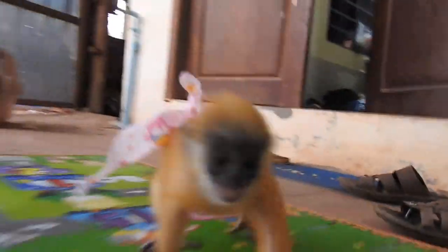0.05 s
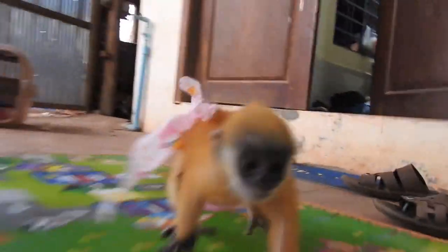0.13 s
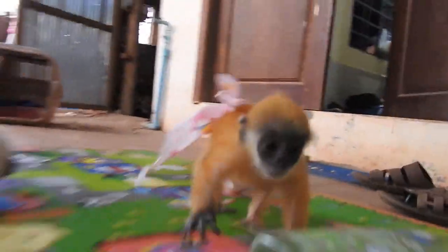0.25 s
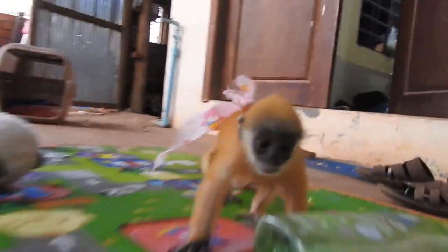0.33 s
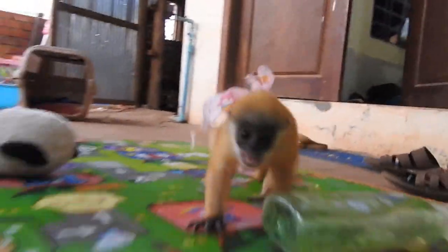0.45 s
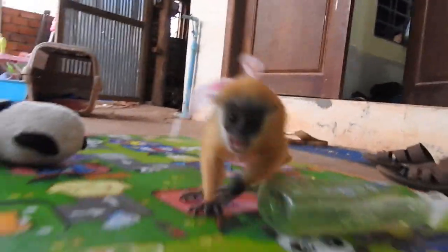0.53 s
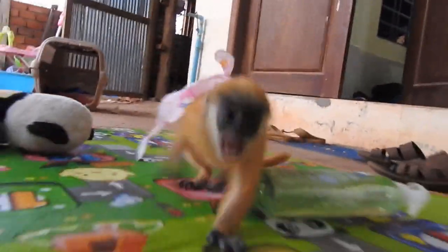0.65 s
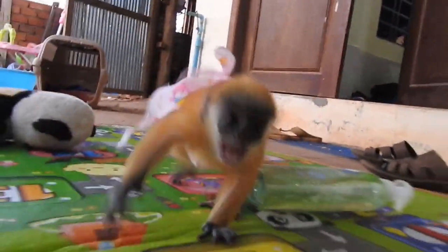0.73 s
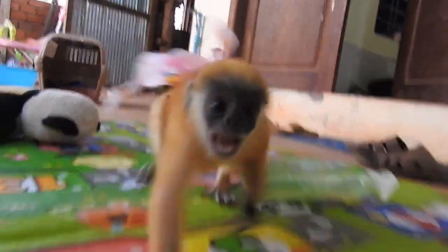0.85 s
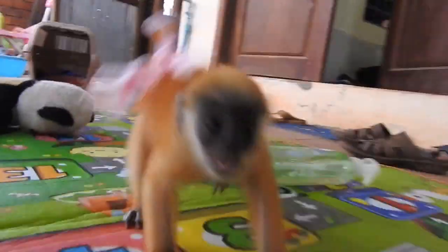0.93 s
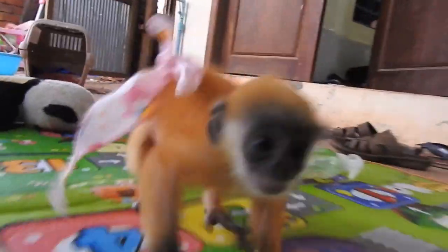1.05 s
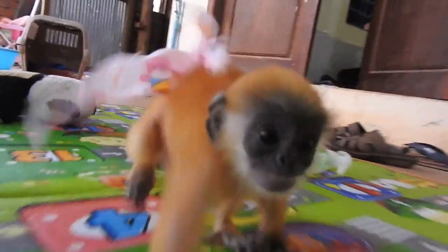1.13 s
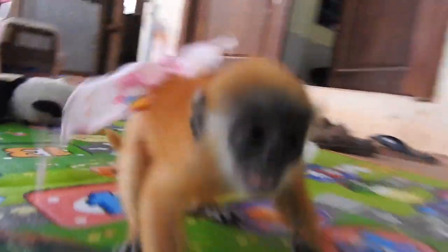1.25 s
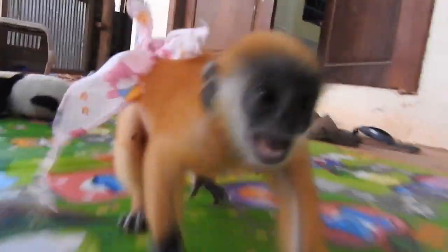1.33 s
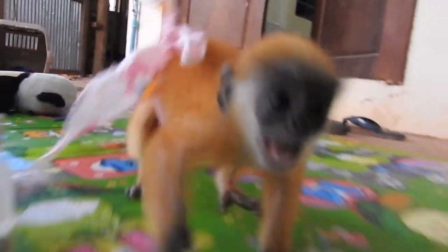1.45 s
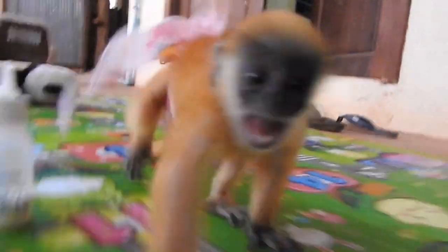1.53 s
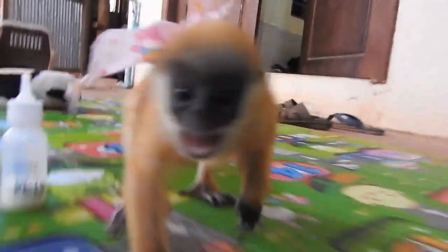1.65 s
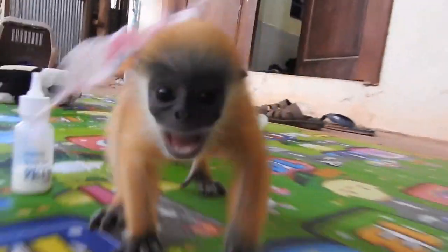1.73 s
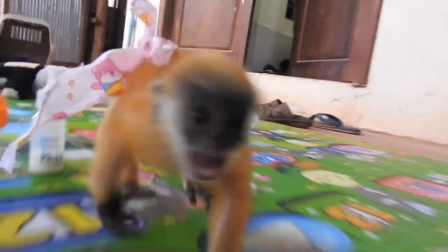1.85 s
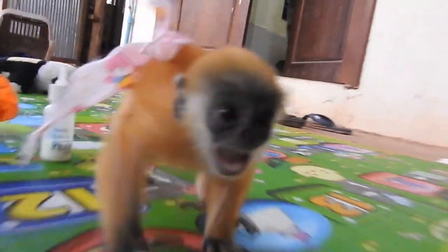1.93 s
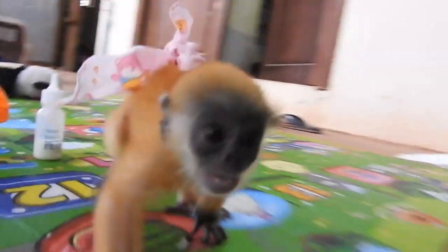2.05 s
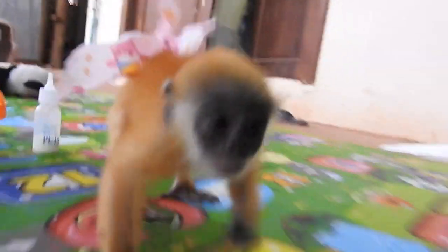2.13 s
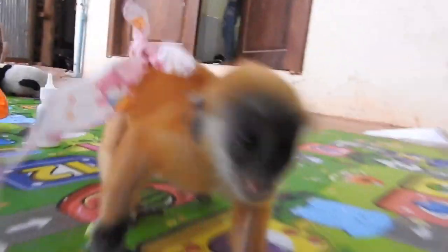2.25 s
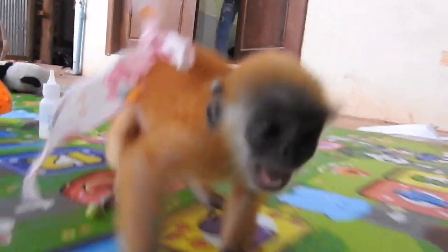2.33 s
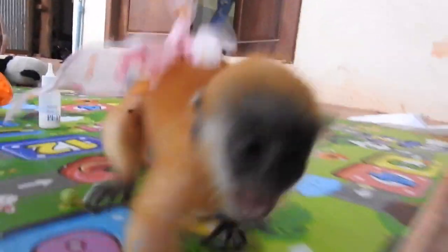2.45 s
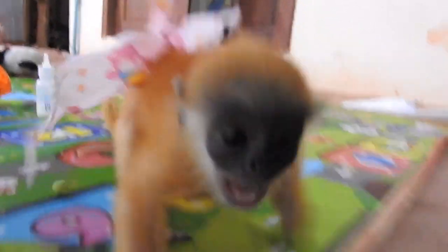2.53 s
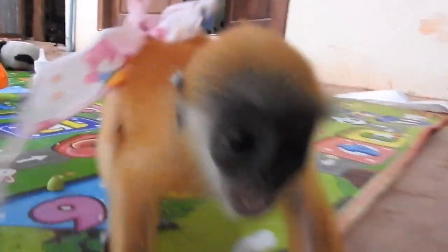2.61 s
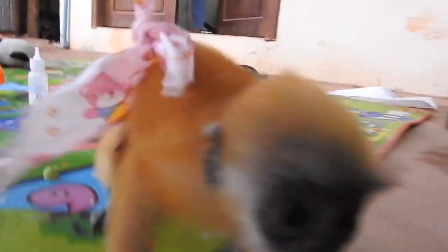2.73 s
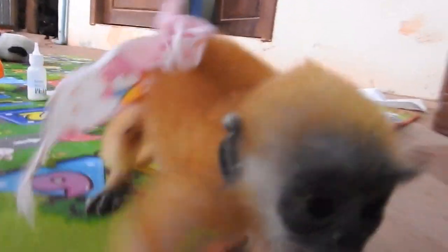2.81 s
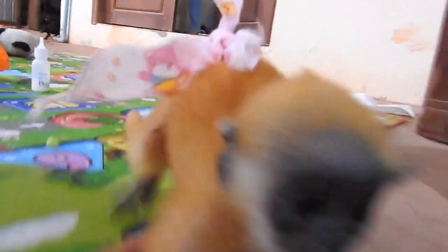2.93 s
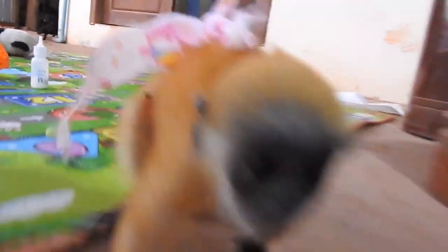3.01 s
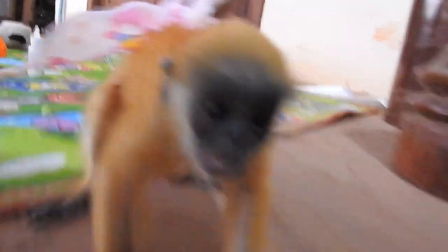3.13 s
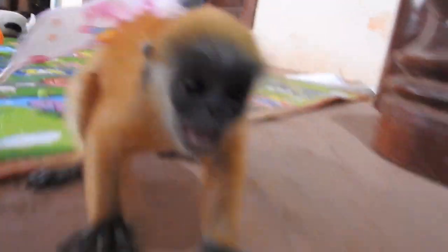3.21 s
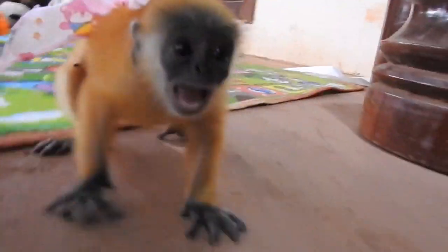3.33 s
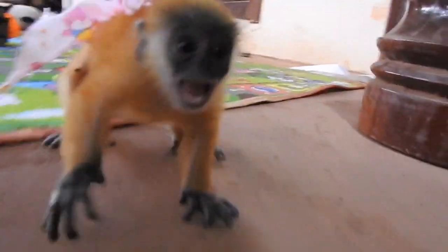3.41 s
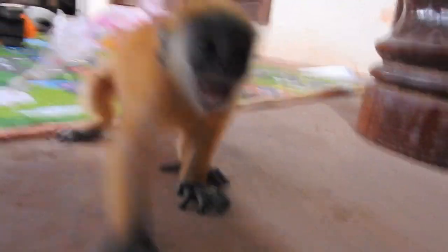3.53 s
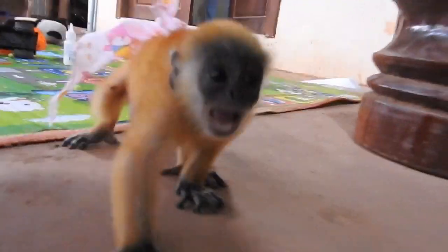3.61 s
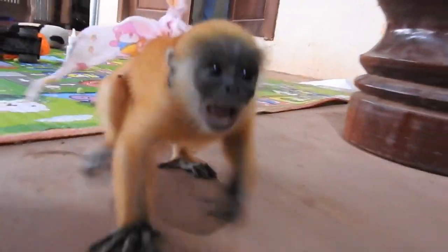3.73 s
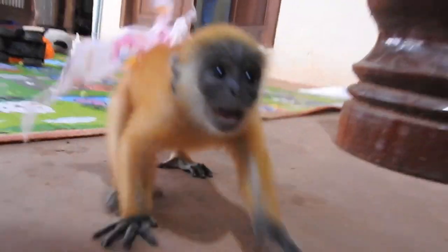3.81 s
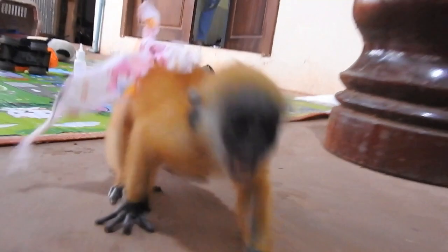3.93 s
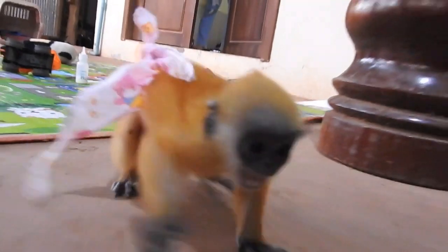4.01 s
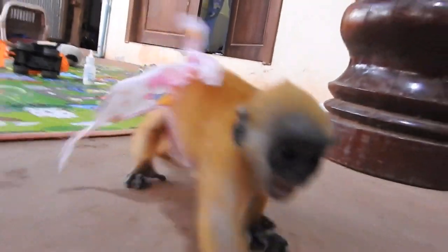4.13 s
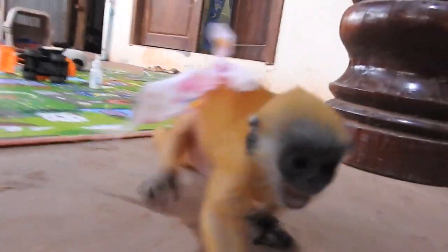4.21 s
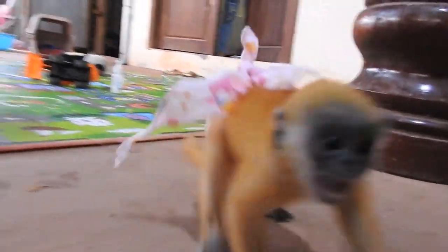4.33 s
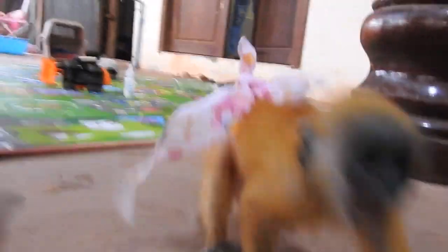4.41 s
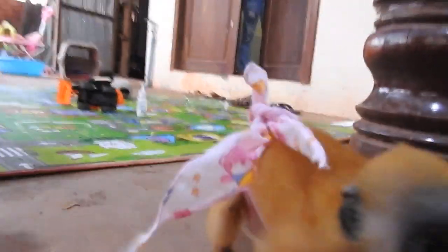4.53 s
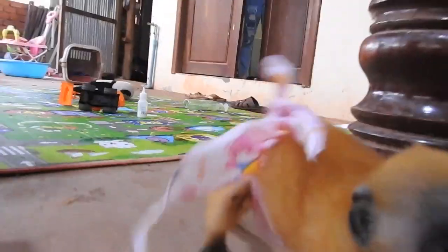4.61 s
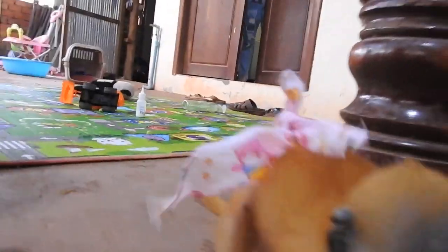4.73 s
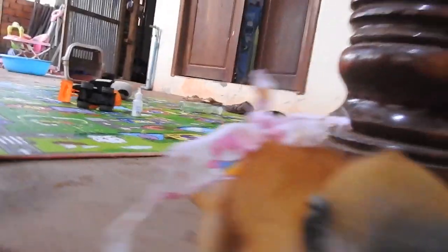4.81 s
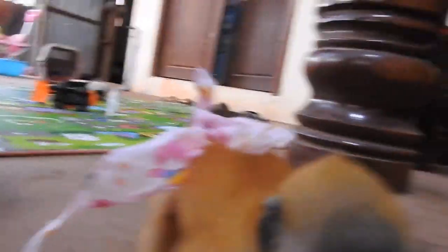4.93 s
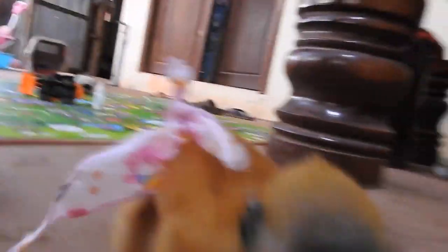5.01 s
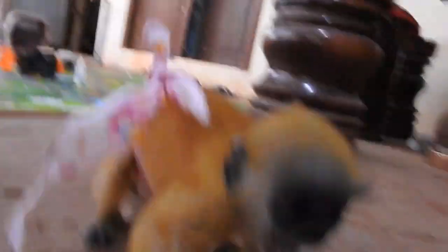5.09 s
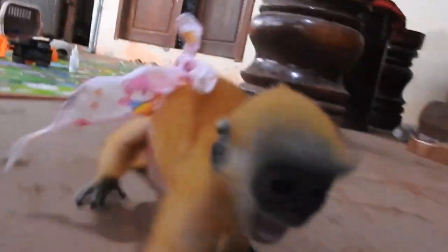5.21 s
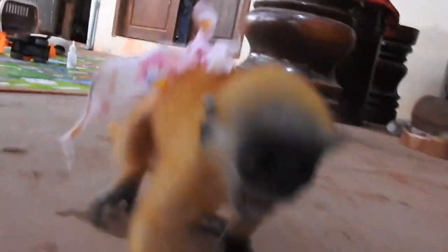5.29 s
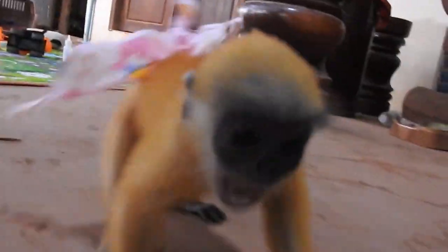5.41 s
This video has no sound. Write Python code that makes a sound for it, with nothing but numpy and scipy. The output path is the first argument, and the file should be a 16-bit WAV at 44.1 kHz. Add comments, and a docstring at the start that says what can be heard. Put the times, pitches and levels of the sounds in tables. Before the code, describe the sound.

Very close, bright, loud animal calls: a baby monkey's thin nasal cries climb into shrill quavering wails and break off with an upward flick. Early on, one splinters into raspy shrieks; a later one cracks briefly. Snatched gasps fill the gaps. Palms and feet thud lightly on mat and floor over uneven low rumble, with short reflections from nearby walls.

```python
"""A baby monkey crawls over a play mat and a porch floor, crying close to two microphones.
It opens on the end of a shriek; then come a gasp and a cry that breaks into a string of rough shrieks.
Five more cries follow, the second of them breaking too: harmonics gliding through throat and mouth.
Gasps of shaped noise come between cries, and hands and feet pat the floor as resonant noise bursts.
Throughout, a low noise rumble and faint scuffs run beneath, and the walls give a short echo."""
import sys
import numpy as np
from scipy import signal
from scipy.fft import rfft, irfft, next_fast_len
from scipy.io import wavfile
from scipy.ndimage import uniform_filter1d

SR = 44100
rng = np.random.default_rng(int(sys.argv[2]) if len(sys.argv) > 2 else 0)


def to_wav(sig):
    """Store sig (one row per channel, or 1-D mono) as 16-bit WAV at the path in sys.argv[1].

    Samples outside -1..1 are clipped; the rate is SR.
    """
    pcm = np.clip(np.atleast_2d(sig), -1, 1) * 32767
    pcm = np.round(pcm).astype(np.int16)
    wavfile.write(sys.argv[1], SR, pcm.T)  # frames by channels


N = 240697
TIME = np.arange(N) / SR  # s

# Colour of the background rumble. Each row: frequency in Hz, relative level in dB.
RUMBLE_COLOUR = [(25, -42), (55, -5.5), (90, 3), (130, 1), (250, -8.5), (400, -18.5), (800, -14),
                 (1500, -19), (3000, -17.5), (7000, -21.5), (11000, -41), (15000, -51)]
# Colour of skin on the floor. Each row: frequency in Hz, relative level in dB.
PAT_COLOUR = [(80, 3), (280, 10), (550, 4), (1200, 3), (2000, -5), (5000, -4.5), (12000, -65)]
# Pats of hands and feet. Each row: start in seconds, level in dB before the overall trim,
# main pitch in Hz, ring time to -60 dB in seconds.
PATS = [(0.177, -17.5, 1400, 0.05), (0.361, -25, 895, 0.034), (0.439, -33, 2620, 0.015),
        (1.248, -26.5, 1580, 0.35), (1.493, -22.5, 2080, 0.15), (1.524, -11.5, 556, 0.057),
        (1.694, -17, 1260, 0.035), (1.909, -19, 250, 0.039), (1.927, -18.5, 1130, 0.048),
        (2.081, -17.5, 1292, 0.027), (2.112, -18, 300, 0.14), (2.922, -15, 526, 0.15),
        (2.974, -21.5, 530, 0.044), (2.992, -19.5, 690, 0.082), (3.313, -15.5, 735, 0.12),
        (3.828, -11.5, 525, 0.17), (4.644, -21.5, 1440, 0.14), (4.872, -18.5, 406, 0.066)]
# Colour of the indrawn breath. Each row: frequency in Hz, relative level in dB.
GASP_COLOUR = [(240, -45), (400, -9.5), (660, -8), (1230, -7.5), (1610, -4.5), (3500, -4.5), (5030, -8.5),
               (6610, -6), (11600, -34.5), (15000, -53)]
# Gasps. Each row: peak time in seconds, rise in seconds, fall in seconds, level in dB.
GASPS = [(0.251, 0.052, 0.036, -23.5), (1.099, 0.042, 0.095, -28), (2.12, 0.034, 0.047, -17.5),
         (2.282, 0.002, 0.036, -24), (2.346, 0.0034, 0.012, -23), (3.095, 0.031, 0.05, -23),
         (3.157, 0.03, 0.055, -27.5), (4.865, 0.047, 0.049, -26.5)]
# Throat colour. Each row: frequency in Hz, relative level in dB.
THROAT_COLOUR = [(800, -13.5), (1250, -23), (1700, -12), (2450, -7), (3000, -5.5), (3700, -10), (4800, 6.5),
                 (6000, 5.5), (7000, 5.5), (9000, -2.5), (10300, -13), (12000, -16.5), (15000, -36)]
# The voice catches and spits as it changes register.
# Each row: centre in seconds, half length in seconds, level change in dB.
CATCHES = [(2.742, 0.0021, -21), (2.756, 0.0019, 22), (2.758, 0.0061, -23), (2.766, 0.0015, 6),
           (2.776, 0.0015, 7), (2.802, 0.0017, -13)]
# The voice turns hoarse for a moment.
# Each row: centre in seconds, half length in seconds, added roughness from 0 to 1.
RASPS = [(0.714, 0.028, 0), (1.322, 0.03, 0.39), (2.061, 0.066, 0.22), (2.4, 0.044, 0.2),
         (4.102, 0.054, 0.4), (5.405, 0.184, 0.4)]
# Shrieks, where the voice breaks into another register (two at once when they overlap).
# Each row: start in seconds, end in seconds, first pitch in Hz, last pitch in Hz, shrill part in dB,
# lower part in dB, mouth resonance in Hz, roughness from 0 to 1, quaver depth as share of pitch,
# time of one quaver crest in seconds, final flick as share of pitch.
SHRIEKS = [(0, 0.065, 2450, 2510, -8.5, -24, 6500, 0.29, 0.087, .016, .46),
           (.698, 0.813, 1428, 1375, -13.5, -23, 7050, 0.51, 0.036, 0.62, 0),
           (.7, 0.814, 2320, 2418, -10, -28.5, 6660, 0.54, 0.057, .745, 0.062),
           (.813, 0.892, 1674, 1338, -10.5, -24, 4670, 0.18, 0.045, .85, .1),
           (0.891, 0.935, 2184, 2045, -7.5, -22.5, 6300, 0.25, .02, .91, 0),
           (0.938, 1.086, 1832, 1606, -9, -31.5, 5760, 0.18, 0.11, .969, 0.1),
           (2.738, 2.773, 2260, 1938, -7.5, -14, 6200, 0.38, 0.024, 2.75, 0.0099),
           (2.779, 2.79, 1795, 1670, -6, -31, 5500, .3, 0, 2.78, 0),
           (2.794, 2.915, 1306, 1021, -11, -22.5, 5000, 0.26, .01, 2.83, 0.41)]
# The pitch each cry climbs through under its quaver, one list for each cry.
# Each row: time in seconds, pitch in Hz.
CLIMBS = [
    [(.5, 877), (.555, 949), (.6, 1073), (.7, 1196)],
    [(1.265, 803), (1.38, 908), (1.425, 1009), (1.64, 1038), (1.707, 1196), (1.88, 1148), (2.073, 1207)],
    [(2.35, 814), (2.44, 833), (2.59, 1158), (2.738, 1201)],
    [(3.22, 801), (3.287, 822), (3.474, 1124), (3.616, 1232), (3.824, 1046)],
    [(4.003, 855), (4.08, 875), (4.21, 1096), (4.29, 1130), (4.46, 1068), (4.53, 1201), (4.61, 1089),
     (4.71, 1016), (4.781, 1096)],
    [(4.938, 805), (4.985, 819.4), (5.15, 1063), (5.22, 1103), (5.31, 1255), (5.456, 1211)],
]
# Cries. Each row: start in seconds, end in seconds, swell in seconds, release in seconds,
# shrill part in dB, its fade in dB per second, lower part in dB, lead of the lower part at the start in dB,
# nasal resonance in Hz, mouth resonance at first in Hz, mouth resonance at last in Hz,
# roughness from 0 to 1, full quaver depth as share of pitch, quaver rate in Hz,
# time of one quaver crest in seconds, final flick as share of pitch.
CRIES = [(0.502, 0.702, 0.051, .003, -8.5, 5, -25, 2.5, 2740, 4900, 4380, 0.2, 0.0063, 13, 0.51, 0.34),
         (1.266, 2.072, 0.13, 0.0018, -8.5, 1.5, -23.5, 3.5, 1640, 5500, 6670, 0.19, 0.022, 18.8, 1.75, 0.19),
         (2.354, 2.736, 0.063, 0.0027, -11.5, -7, -24, 7, 3480, 6430, 5500, 0.17, 0.02, 18.3, 2.77, 0.22),
         (3.223, 3.821, 0.055, 0.0018, -8.5, 2, -24, 4.5, 2690, 5760, 6300, 0.1, 0.041, 16.1, 3.565, 0.37),
         (4.003, 4.777, 0.029, 0.092, -8.5, 4.5, -23.5, 6.5, 2830, 7120, 5450, 0.07, 0.0328, 17.5, 4.4, 0.018),
         (4.936, 5.46, 0.079, 0.0026, -10.5, -4, -25.5, 5.5, 2500, 5600, 6020, 0.04, 0.021, 18, 5.04, 0.079)]
# Decay of the echo's tail. Each row: frequency in Hz, time to -60 dB in seconds.
TAIL_T60 = [(200, 1), (1000, 0.041), (4000, 0.26), (8000, 0.52), (14000, 0.19)]
# Balance of the two microphones. Each row: frequency in Hz, left minus right in dB.
LEAN = [(300, 3), (1000, 0), (2200, 0), (5000, 2.5), (8000, 5), (12000, 0.5)]

EDGE_HZ = 15700  # top of the sounding band
SHRIEK_QUAVER_HZ = 17.6
FLICK_S = 0.016  # the pitch shoots up just before a call breaks off
QUAVER_GROWS_S, QUAVER_UNEVEN = 0.409, 0.34  # the quaver deepens with time; some swing wider than others
SWELL_DB, LOWER_SWELL_DB = 36, 1  # how far below full strength the shrill and the lower part start
OPENING_S = 0.1  # the lower part leads for about this long
RELEASE_DB = 4  # how far a cry sinks before it stops
MOUTH_SWAY_HZ = 300


def amp(db):
    """Decibels to gain."""
    return 10 ** (np.asarray(db) / 20)


def unit(x):
    """Scales to rms 1."""
    return x / np.sqrt(np.mean(x ** 2) + 1e-20)


def read(points, hz):
    """Reads a spectrum on a log-frequency axis."""
    f, value = np.transpose(points)
    return np.interp(np.log(hz + 1), np.log(f + 1), value)


def follow(rows, t):
    """Reads every column of a curve table at the times t."""
    s, *columns = np.transpose(rows)
    return [np.interp(t, s, c) for c in columns]


def add(mix, s, sound):
    """Mixes a sound in at time s."""
    part = mix[max(round(s * SR), 0):][:len(sound)]
    part += sound[:len(part)]


def noise(colour, size=N):
    """Steady noise with a given spectrum."""
    full = next_fast_len(size)
    white = rfft(rng.standard_normal(full))
    gain = amp(read(colour, np.fft.rfftfreq(full, 1 / SR)))
    return unit(irfft(white * gain, full)[:size])


def wander(hz, size=N):
    """Random drift, mostly no faster than hz."""
    lowpass = signal.butter(2, hz, fs=SR, output="sos")
    drift = signal.sosfilt(lowpass, rng.standard_normal(size + SR // 2))
    return unit(drift)[-size:]


def resonate(x, hz, width):
    """One fixed resonance of gain 1, with its width in Hz."""
    r = np.exp(-np.pi * width / SR)
    return 2 * signal.lfilter([1 - r], [1, -r * np.exp(2j * np.pi * hz / SR)], x).real


def bump(f, hz, width):
    """A resonance shape of height 1."""
    return 1 / (1 + ((f - hz) / width) ** 2)


def background(rumble_db=-35.0, swell_db=2, scuff_db=-50, scuff_spread_db=5):
    """Uneven low rumble, and faint scuffs of limbs on the mat."""
    rumble = amp(rumble_db + swell_db * wander(9.0)) * noise(RUMBLE_COLOUR)
    scuffs = amp(scuff_db + scuff_spread_db * np.minimum(wander(16), 2)) * noise(PAT_COLOUR)
    return rumble + scuffs


def pats(trim_db=-1, ring_db=7, width_hz=150, rise_s=0.00021, thud_db=-15, thud_hz=105, thud_t60=0.17):
    """A soft palm meets the floor: a dull burst with one broad resonance, and a low thud that lingers."""
    slap, out = noise(PAT_COLOUR), np.zeros(N)
    t = np.arange(SR // 3) / SR
    for s, db, hz, t60 in PATS:
        burst = slap[int(s * SR):][:len(t)]
        ring = amp(ring_db) * resonate(burst, hz, width_hz)
        body = unit(burst + ring) * amp(-60 * t / t60)
        low = resonate(resonate(burst, thud_hz, thud_hz / 2), thud_hz, thud_hz / 2)
        thud = unit(low) * amp(thud_db - 60 * t / thud_t60)
        add(out, s, amp(db + trim_db) * (body + thud) * (1 - np.exp(-t / rise_s)))
    return out


def gasps(grain_db=2):
    """The monkey snatches air through its open mouth: noise that swells and falls, with a grainy level."""
    swell = 0
    for s, rise, fall, db in GASPS:
        swell = swell + amp(db) * np.exp(-((TIME - s) / np.where(TIME < s, rise, fall)) ** 2)
    return swell * noise(GASP_COLOUR) * amp(grain_db * wander(59))


def span(start, end):
    """The sample times of one call."""
    return np.arange(max(int(start * SR), 0), int((end + 0.0035) * SR)) / SR


def inflect(t, depth, quaver_hz, crest, flick):
    """Pitch factor: a regular quaver, and an upward flick at the end."""
    quaver = depth * np.cos(2 * np.pi * quaver_hz * (t - crest))
    return 1 + quaver + flick * np.exp(np.minimum(t - t[-1] + 0.0031, 0) / FLICK_S)


def call(t, hz, shrill_db, lower_db, mouth_hz, roughness, nasal_hz=3250,
         mouth_db=11, mouth_width_hz=520, nasal_db=13, nasal_width_hz=330,
         second_db=3, third_db=-6, split_hz=3850, flicker_db=2,
         jitter_depth=0.079, quiver=0.0032, shimmer=0.72, doubling=0.16, air_db=-9,
         ripple_db=4.0, bounce_s=0.000709, bounce_drift_s=0.00008):
    """A stack of harmonics glides through the throat; the open mouth lifts those near its resonance."""
    size = len(t)
    rough = np.clip(roughness, 0, 1)
    # roughness shakes the period of the vocal folds and makes strong and weak cycles alternate
    jitter = jitter_depth * rough ** 1.4 * wander(910, size) + quiver * wander(60, size)
    phase = 2 * np.pi * np.cumsum(hz * (1 + jitter)) / SR
    flutter = unit(1 + rough * (shimmer * wander(710, size) + doubling * np.cos(phase / 2)))
    k = np.arange(1, 18)[:, None]
    f = k * hz
    # low pitch sounds nasal; as the pitch climbs the second harmonic takes over from the third
    closed = np.clip((1005 - hz) / 160, 0, 1)
    colour_db = read(THROAT_COLOUR, f) + mouth_db * bump(f, mouth_hz, mouth_width_hz)
    colour_db += nasal_db * closed * bump(f, nasal_hz, nasal_width_hz)
    colour_db += (1 - closed) * (second_db * (k == 2) + third_db * (k == 3))
    # the bounce off the floor combs the harmonics and shifts as the head bobs
    bounce = bounce_s + bounce_drift_s * wander(3.87, size)
    colour_db += ripple_db * np.cos(2 * np.pi * f * bounce)
    # each harmonic swells and fades a little by itself
    colour_db += flicker_db * np.array([wander(31, size) for _ in k])
    gain = amp(colour_db) * (f < EDGE_HZ)
    # the shrill part lies above the split, the lower part below; each is set to its own level
    upper = 1 / (1 + (split_hz / f) ** 20)
    level = 0
    for share, db in [(upper, shrill_db), (1 - upper, lower_db)]:
        power = ((gain * share) ** 2).sum(0) / 2
        level = level + share * amp(db) / np.sqrt(power + 1e-9)
    air = amp(air_db + shrill_db) * rough ** 0.81 * noise(THROAT_COLOUR, size)
    # the throat rings on between pulses, which spreads the harmonics in phase
    harmonics = gain * level * np.cos(k * phase + np.pi * k ** 2 / 5)
    voice = harmonics.sum(0) * flutter + air
    catch_db = sum(db * np.exp(-((t - s) / half) ** 2) for s, half, db in CATCHES)
    edges = np.clip(np.minimum(t - t[0], t[-1] - t) / 0.0061, 0, 1)
    return t[0], voice * amp(catch_db) * edges


def shriek(start, end, first_hz, last_hz, shrill_db, lower_db, mouth_hz, rough, depth, crest, flick,
           unsteady=0.042):
    """A short burst in another register: at full strength almost at once, sliding and unsteady."""
    t = span(start, end)
    slide = np.linspace(first_hz, last_hz, len(t))
    hz = slide * inflect(t, depth, SHRIEK_QUAVER_HZ, crest, flick)
    hz = hz * (1 + unsteady * rough * wander(127, len(t)))
    return call(t, hz, shrill_db, lower_db, mouth_hz, rough)


def cry(climb, start, end, swell, release, shrill_db, fade_db_per_s, lower_db, lead_db, nasal_hz,
        mouth_first_hz, mouth_last_hz, rough, depth, quaver_hz, crest, flick):
    """A long cry: it starts low and mellow, turns shrill as it climbs, and its quaver deepens."""
    t = span(start, end)
    age = t - t[0]
    growth = np.minimum(age / QUAVER_GROWS_S, 1)
    depth = depth * growth * (1 + QUAVER_UNEVEN * wander(10.5, len(t)))
    glide = uniform_filter1d(follow(climb, t)[0], size=900)
    hz = glide * inflect(t, depth, quaver_hz, crest, flick)
    weak = np.clip(1 - age / swell, 0, 1) ** 1.09
    sink = RELEASE_DB * np.exp((t - t[-1]) / release)
    shrill = shrill_db - SWELL_DB * weak - fade_db_per_s * age - sink
    lead = lead_db * np.exp(-(age / OPENING_S) ** 2)
    lower = lower_db - LOWER_SWELL_DB * weak + lead - 0.43 * fade_db_per_s * age - sink
    mouth_hz = np.linspace(mouth_first_hz, mouth_last_hz, len(t)) + MOUTH_SWAY_HZ * wander(10.7, len(t))
    rough = rough + sum(more * np.exp(-((t - s) / half) ** 2) for s, half, more in RASPS)
    return call(t, hz, shrill, lower, mouth_hz, rough, nasal_hz)


def monkey():
    """All the cries, and the shrieks of the breaking voice."""
    out = np.zeros(N)
    for climb, row in zip(CLIMBS, CRIES):
        add(out, *cry(climb, *row))
    for row in SHRIEKS:
        add(out, *shriek(*row))
    return out


def room(x, early_db=-13, early_t60=0.1, tail_db=-12):
    """Floor and near walls answer first, then a short tail; each microphone hears its own pattern."""
    t = np.arange(SR // 2) / SR
    signs = rng.choice([-1., 1.], (2, len(t)))
    sparse = rng.random((2, len(t))) < 2500 / SR  # about 2500 reflections a second
    taps = signs * sparse * (t > 0.001)
    early = taps * amp(-60 * t / early_t60)
    # in the tail each frequency dies away at its own rate
    hz, s, z = signal.stft(taps * (t > 0.012), SR, nperseg=256)
    decay = amp(-60 * s / read(TAIL_T60, hz)[:, None])
    tail = signal.istft(z * decay, SR, nperseg=256)[1][:, :len(t)]
    echo = 0
    for db, part in [(early_db, early), (tail_db, tail)]:
        echo = echo + amp(db) * part / np.linalg.norm(part, axis=1, keepdims=True)
    return signal.fftconvolve(x[None], echo, axes=1)[:, :N]


def microphones(x, lag):
    """Two close microphones; the right one hears most bands softer, and all of them lag samples later."""
    spectrum = rfft(x, 2 ** 18)
    hz = np.linspace(0, SR / 2, len(spectrum))
    lean = amp(read(LEAN, hz) / 2)
    right = np.exp(-2j * np.pi * hz * lag / SR) / lean
    return irfft(spectrum * np.array([lean, right]))[:, :N]


def scene():
    """The monkey's voice in front, slightly left, over the sounds of the floor."""
    voice, steps = monkey() + gasps(), pats()
    close = microphones(voice, lag=0.43) + microphones(steps + background(), lag=0.97)
    return close + room(voice + amp(-8.5) * steps)


def record(dry, threshold_db=-20, squeeze=0.33, recovery_db_per_s=45):
    """Gain control turns loud sounds down and recovers after them; peaks clip; then the band limit."""
    power = uniform_filter1d((dry ** 2).mean(0), size=400)
    power_db = 10 * np.log10(abs(power) + 1e-12)
    fall = TIME * recovery_db_per_s
    # the running peak, sinking at the recovery rate
    held_db = np.maximum.accumulate(power_db + fall) - fall
    over_db = np.maximum(held_db - threshold_db, 0)
    reduction = amp(squeeze * uniform_filter1d(over_db, size=200))
    clipped = np.clip(dry / reduction, -1, 1)
    lowpass = signal.firwin(511, EDGE_HZ, window=("kaiser", 9), fs=SR)
    return signal.oaconvolve(clipped, lowpass[None], "same")


dry = scene()
out = record(dry)
to_wav(out)
```